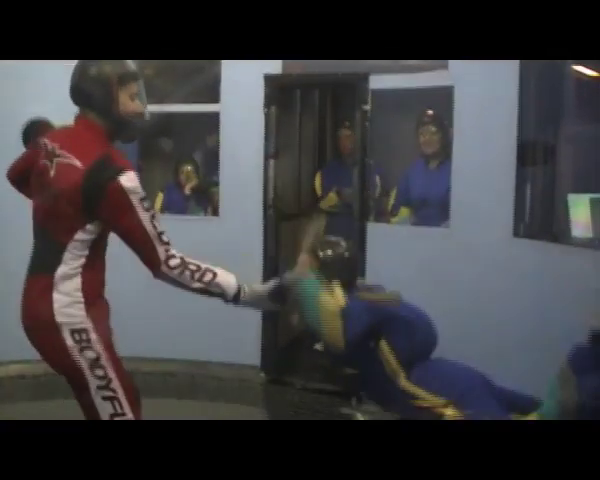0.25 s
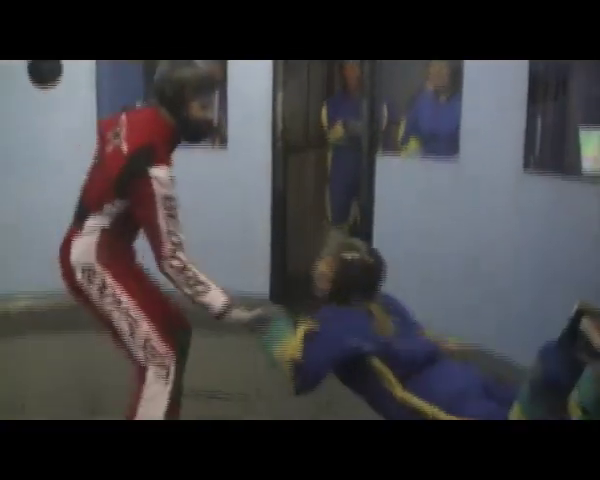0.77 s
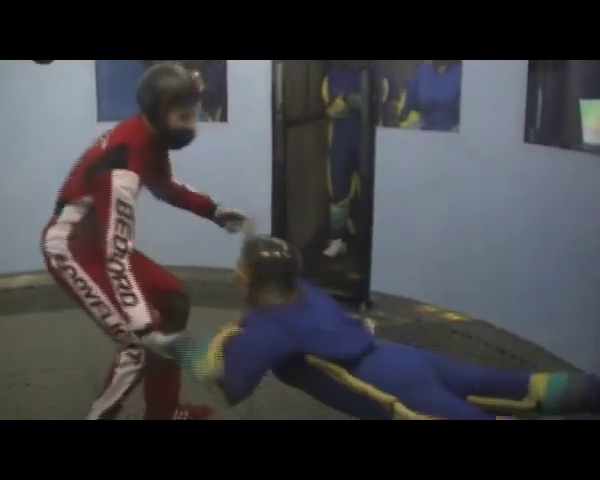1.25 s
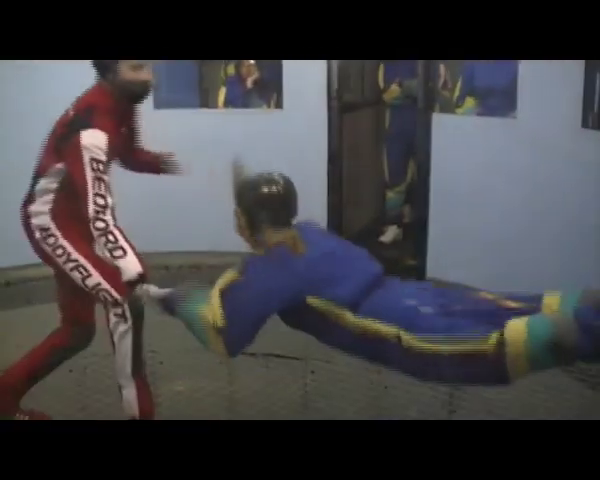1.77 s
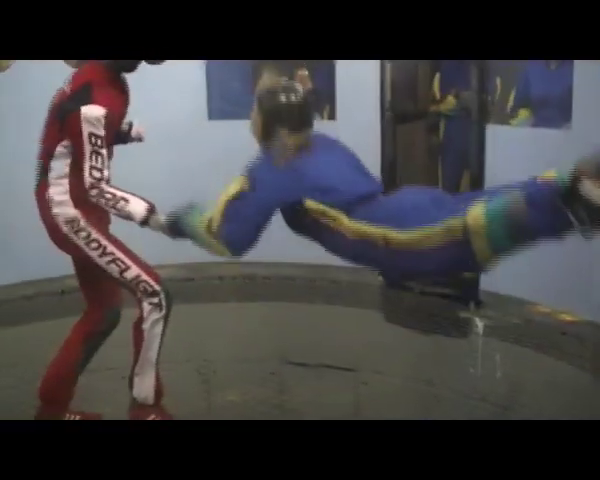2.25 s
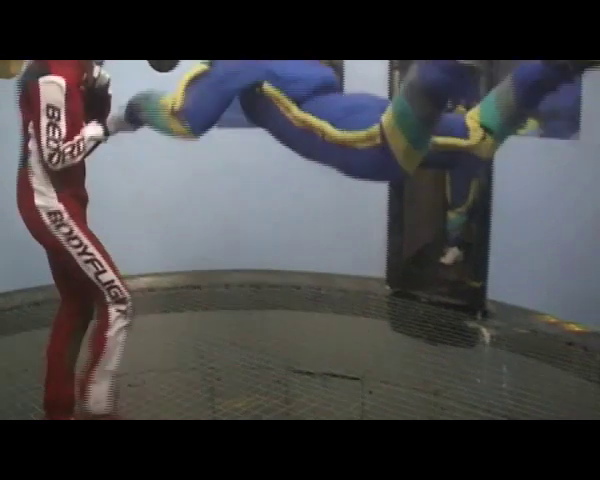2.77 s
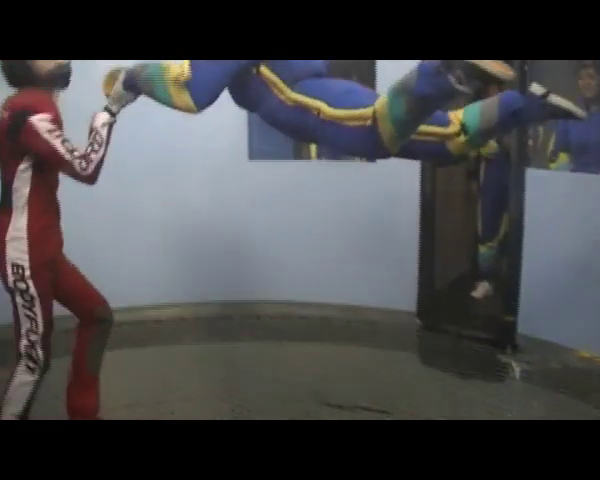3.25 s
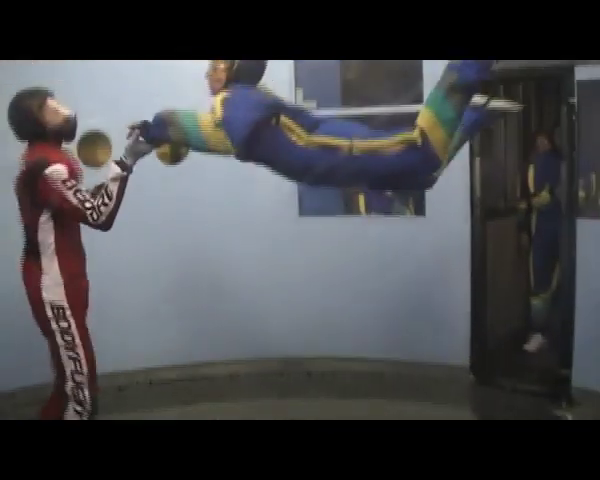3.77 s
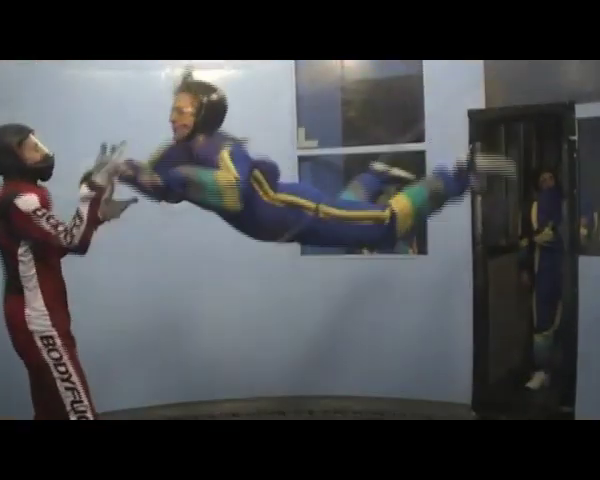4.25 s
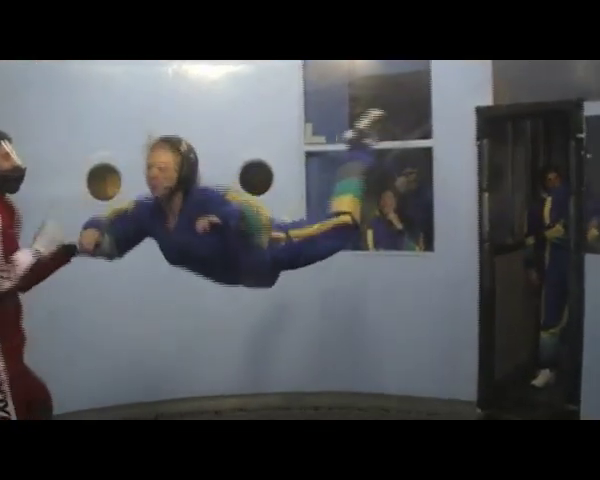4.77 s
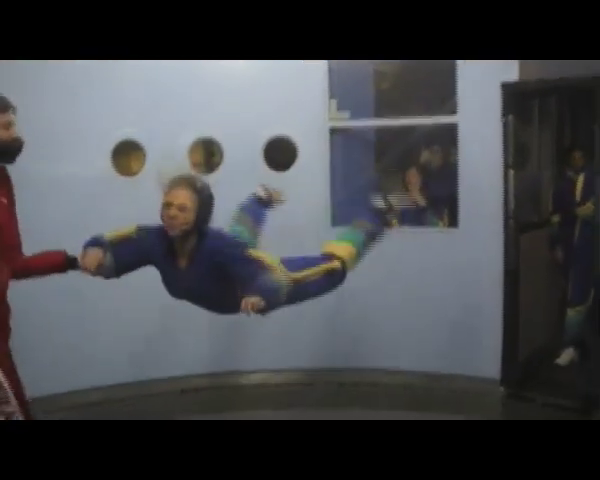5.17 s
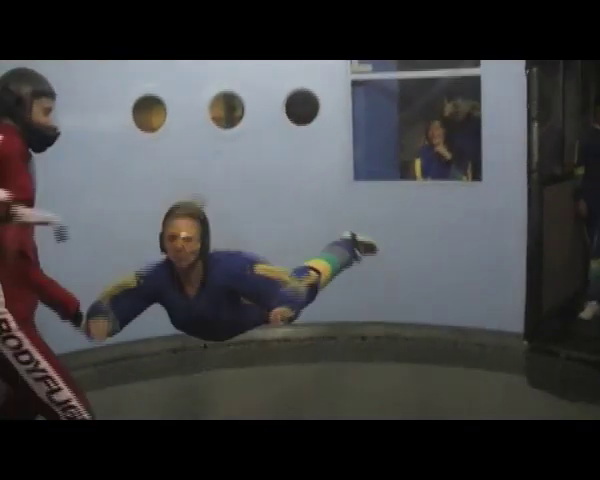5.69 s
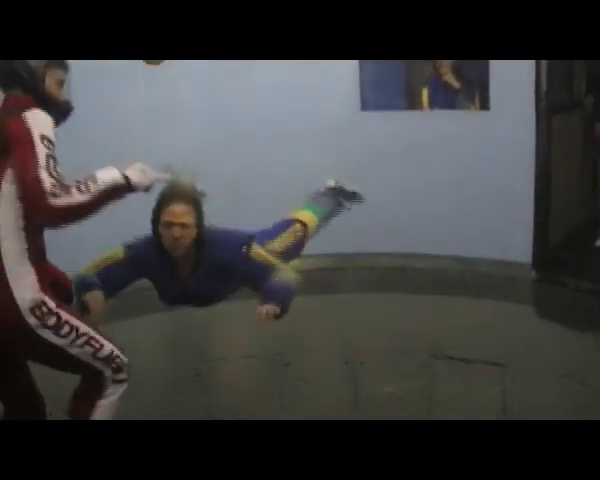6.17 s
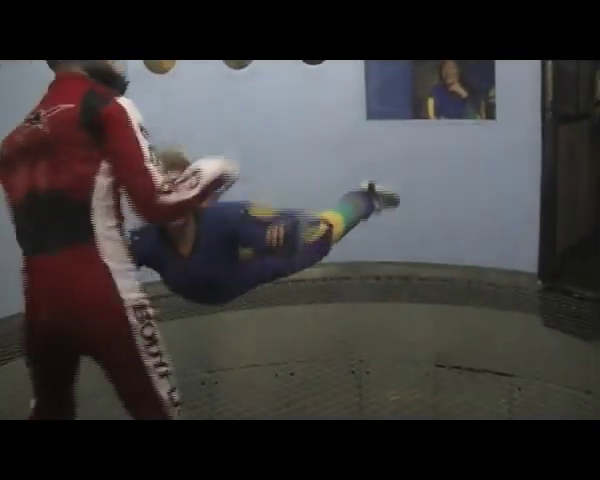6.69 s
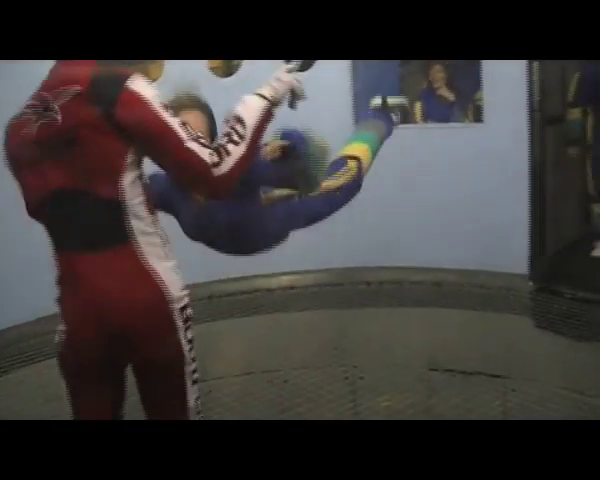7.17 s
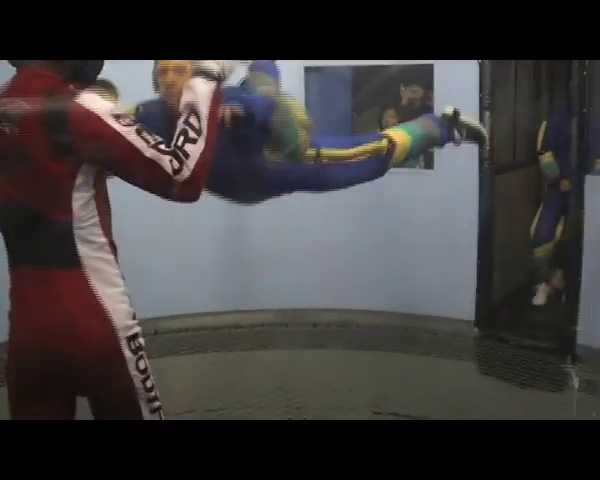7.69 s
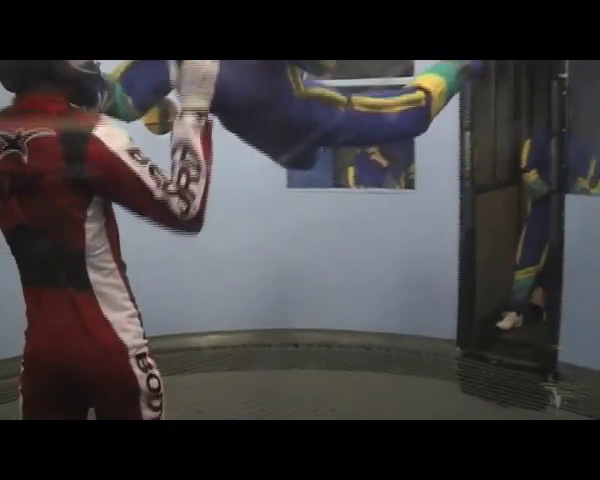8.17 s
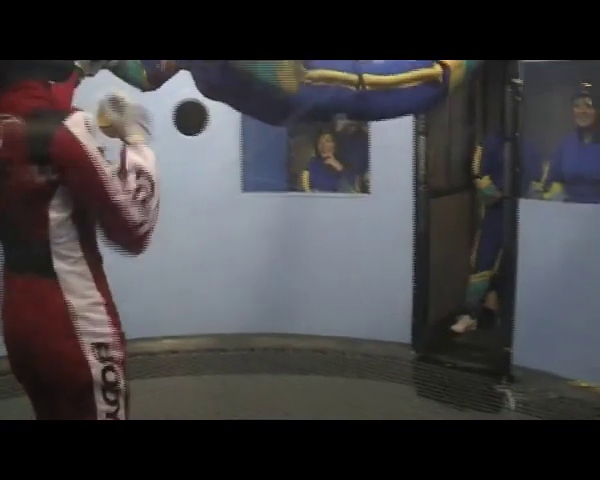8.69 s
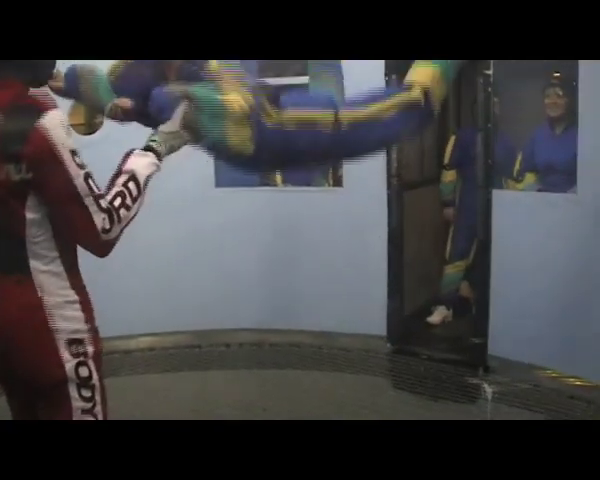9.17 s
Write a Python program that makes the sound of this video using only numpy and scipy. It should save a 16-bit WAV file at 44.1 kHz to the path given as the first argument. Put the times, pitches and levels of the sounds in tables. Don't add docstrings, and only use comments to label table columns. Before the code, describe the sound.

Large fans drone with a deep, wavering hum inside an indoor wind tunnel while a strong, steady rush of air roars throughout.

```python
import sys
import numpy as np
from scipy import signal
from scipy.fft import rfft, irfft, next_fast_len
from scipy.io import wavfile
from scipy.ndimage import uniform_filter1d

SR = 44100
rng = np.random.default_rng(int(sys.argv[2]) if len(sys.argv) > 2 else 0)


def put_to_file(sound):
    columns = np.atleast_2d(sound).T
    safe = np.clip(columns, -1, 1)
    whole_steps = np.round(safe * 32767)
    wavfile.write(sys.argv[1], SR, whole_steps.astype(np.int16))


def volts(x):
    e = np.asarray(x, float) / 20
    return 10 ** e


N = 415925

BLADE_HZ = 62.478
# (multiple of the blade rate, level [dB])
WEAK_TONES = [(1, -67.5), (7, -62), (8, -66.5), (9, -64.5), (10, -71), (11, -77.5), (12, -74), (14, -81)]
CALM_DB = [-46.5, -50, -52.5, -60.5]
FLICKER_DB, FLICKER_PER_S = [1.4, 1.2, 1.2, 1.5], 7.0
# (time [s], lift [dB], length [s])
EDDIES_3RD = [(0.84, 5, 0.75), (0.86, -10.5, 0.17), (1.42, 5.5, 0.17), (1.64, -11.7, 0.17),
              (1.88, -3.1, 0.35), (2.48, -10.5, 0.4), (3.1, -4.0, 0.14), (3.26, 3.5, 0.82),
              (3.66, -4, 0.13), (4.34, -7.5, 0.1), (4.74, -7, 0.68), (5.1, -10.5, 0.16), (5.4, 3.5, 0.16),
              (5.82, -14, 0.12), (6.18, -3.5, 0.28), (6.44, 5.3, 0.14), (6.92, -13.5, 0.18),
              (7.46, -2.5, 0.37), (7.64, -9.5, 0.1), (7.74, 5.5, 0.076), (7.98, 4, 0.4), (8.38, -5, 0.2),
              (8.58, 5, 0.1), (9.04, 6, 0.1)]
# (time [s], lift [dB], length [s])
EDDIES_4TH = [(0.72, 4, 0.1), (0.96, -0.5, 0.13), (1.2, 7.5, 0.1), (1.48, -6, 0.11), (2.16, 4, 0.81),
              (3.44, -17, 0.11), (3.82, 3, 0.088), (4.08, -2.5, 0.1), (5.08, 4, 0.92), (5.6, -10.5, 0.076),
              (6.22, 4, 0.24), (6.66, -7.5, 0.1), (6.94, -5, 0.11), (7.14, -3.1, 0.55), (7.38, -6, 0.14),
              (7.5, 5.5, 0.1), (8.1, 4, 0.14), (8.54, -16.5, 0.12), (9.06, 5.5, 0.11), (9.34, -4.5, 0.4)]
# (time [s], lift [dB], length [s])
EDDIES_5TH = [(0.06, 3.5, 0.086), (0.58, -8.5, 0.08), (0.72, 6.5, 0.078), (0.94, -6, 0.08), (1.08, 6, 0.14),
              (1.46, -3.5, 0.28), (2.46, -7.8, 0.23), (2.96, -9.5, 0.28), (3.4, 2.5, 0.55),
              (3.94, -4, 0.29), (4.18, 5.5, 0.32), (4.4, 5.0, 0.64), (4.76, 5.5, 0.088), (5.24, 5.5, 0.22),
              (5.64, 5.5, 0.14), (6.12, 5.5, 0.28), (6.56, -5, 0.34), (7.02, 4, 0.13), (7.7, 3, 0.99),
              (8.24, -17, 0.17), (8.68, 4, 0.55), (9.14, -10.5, 0.18)]
# (time [s], lift [dB], length [s])
EDDIES_6TH = [(0.68, 5, 0.9), (1.64, 4.6, 0.19), (2.34, 4, 0.13), (3.88, -9, 0.11), (4.96, -4, 0.14),
              (5.56, -7, 0.2), (6.86, -12, 0.12), (7.1, 5, 0.28), (7.78, -11.5, 0.55), (8.3, -3.5, 0.2),
              (8.62, 4, 0.14), (8.92, 4.5, 0.1)]

# (frequency [Hz], width [Hz], level [dB])
DUCT_MODES = [
    [(103.8, 4.9, -3.5), (114, 7.6, -.5)],
    [(154, 11, 0)],
]
LOW_BOOM_DB, LOW_FLICKER_DB = -51, 1.15
UPPER_BOOM_DB, UPPER_FLICKER_DB = -55, 2.5
# (time [s], lift [dB], length [s])
LOW_GUSTS = [(0.4, 1.5, 0.093), (0.9, 4.5, 0.75), (0.94, -6.5, 0.13), (1.18, -5.5, 0.13), (1.26, 6.5, 0.1),
             (1.36, -6, 0.089), (2.06, 6.5, 0.22), (2.24, -3.5, 0.14), (2.66, 4.5, 0.12), (4.02, -2, 0.38),
             (4.36, 2, 0.4), (4.68, -5.5, 0.1), (5.3, 2.5, 0.43), (5.76, -4.5, 0.1), (6.24, 3.5, 0.19),
             (6.52, -3, 0.1), (6.7, -5, 0.1), (7.04, 3.5, 0.4), (7.52, 4.5, 0.085), (7.68, -2, 0.11),
             (7.92, 5.5, 0.1), (8.12, -5, 0.25), (8.66, 4.5, 0.078), (8.96, -6, 0.11), (9.12, 4.5, 0.15),
             (9.32, -9, 0.2)]
# (time [s], lift [dB], length [s])
UPPER_GUSTS = [(0.7, 8.5, 0.1), (1.14, 3.0, 0.25), (1.44, -8, 0.1), (1.76, 5, 0.1), (2.44, 6.5, 0.75),
               (2.58, -7.5, 0.077), (2.8, 6.5, 0.085), (2.9, -8, 0.1), (3.36, 2.5, 0.4), (4.02, 3, 0.81),
               (5.24, -9.5, 0.11), (6.08, -7, 0.14), (6.6, -5.5, 0.1), (7.04, 7.5, 0.1), (7.44, 7, 0.2),
               (7.64, -9.5, 0.11), (8.34, 2.5, 0.1), (9.1, -6, 0.75)]
# (frequency [Hz], width [Hz], level [dB])
CHAMBER_MODES = [(24, 6.0, -70.5), (37, 8.8, -69.5), (63, 8.7, -64), (240.8, 6.2, -56.5), (297, 33, -62.5),
                 (652.6, 10, -73)]
# (frequency [Hz], level per Hz [dB])
RUMBLE_COLOUR = [(15, -15.5), (30, -12), (48, -15.5), (80, -12), (95, -9), (168, -4), (195, -0.5),
                 (270, -4.5), (340, -11), (400, -7.5), (545, -15.5), (600, -15), (800, -25.5)]
RUMBLE_DB = -48.5

# (frequency [Hz], level per Hz [dB])
RUSH_COLOUR = [(300, -30), (500, -4.5), (640, -5.5), (900, -11.5), (1250, -11.5), (1800, -18), (2600, -28),
               (3100, -26.5), (3480, -18.5), (3900, -26.5), (4300, -29.5), (4900, -46), (6000, -66.5)]
# (frequency [Hz], level per Hz [dB])
FIZZ_COLOUR = [(3500, -29), (4600, -1.5), (5500, -2.5), (6800, -3.5), (8000, -5.5), (9200, -11.5),
               (10200, -19), (11500, -24.5), (13000, -37.5), (16000, -47.5)]
RUSH_DB, FIZZ_DB, SURGE_DB = -59, -26.5, 0.6
# (time [s], level [dB])
AIRFLOW = [(0, .2), (.75, -0.7), (1.3, 0.5), (1.95, 1.5), (2.3, 0.1), (2.6, 1.1), (3.45, -0.2), (3.75, 0),
           (4.5, -0.2), (5.2, .8), (5.65, -2), (6.1, 1), (6.75, -0.6), (7.2, .5), (8.2, -1.2), (8.6, -.5),
           (9.43, -2.6)]
# (time [s], lift [dB])
RUSTLE = [(0, 0.5), (1.27, .6), (1.35, 0), (1.7, 1.5), (2.4, 0), (2.8, -.5), (4.3, 0.5), (4.8, 0),
          (5.4, .5), (6.6, 0), (7.0, 0), (9.43, 0)]

# (time [s], level [dB], frequency [Hz], width [Hz], length [s])
FLAPS = [(1.13, -80, 6300, 900, .035), (1.447, -89, 6000, 1500, 0.022), (1.54, -81, 6100, 1500, .025),
         (1.61, -81, 6300, 1200, .03), (1.699, -83, 6000, 2000, .035), (1.768, -83, 5700, 900, .02),
         (2.342, -93, 6460, 2500, 0.025), (4.604, -80, 6900, 500, .015), (4.617, -82, 5300, 380, .09),
         (4.64, -87, 6400, 2500, .12), (4.98, -87, 6700, 600, .07), (5.05, -83, 5000, 500, .03),
         (4.683, -87, 6000, 1500, 0.044), (5.056, -79, 7800, 1700, 0.049), (5.378, -84, 5800, 2000, 0.02),
         (6.198, -83, 7430, 2500, .03), (6.29, -86, 7500, 2520, 0.032), (7.37, -92, 7500, 2500, 0.044),
         (9.308, -80, 8300, 1000, .04)]
# (time [s], level [dB])
SNAPS = [(0.063, -84), (0.223, -90), (0.333, -86), (0.448, -85), (0.608, -88), (0.698, -90), (0.893, -89.7),
         (1.008, -89), (1.088, -84), (1.2, -87), (1.692, -87), (1.903, -88), (2.128, -89), (2.368, -87),
         (2.657, -92), (3.408, -89.9), (3.503, -89.5), (4.187, -89), (4.497, -91), (4.544, -88),
         (4.624, -89.9), (4.8, -90), (5.053, -88), (5.169, -90), (5.343, -87.5), (6.175, -93), (6.207, -87),
         (6.291, -93), (6.463, -90.5), (7.346, -90.0)]
SNAP_SOUND = 9300, 2100, .02
FAINT_COUNT, FAINT_DB, FAINT_SPREAD_DB = 120, -95.5, 4.5

# (frequency [Hz], left-right likeness, left lead [rad], left-right level [dB])
MIC_PORTS = [(30, .98, -1.35, 9), (60, .98, -.8, 5.3), (120, .998, -.6, 3.7), (250, .994, -.42, 3.0),
             (500, .955, -.3, 1.3), (1000, .905, -.1, .3), (2200, .86, .08, 1), (4400, .88, .03, .9),
             (6000, .85, 0, 1.5), (7300, .66, 0, 1.1), (8600, -.45, 0, .3), (9600, -.15, 0, .2),
             (14000, .02, 0, 1.0)]
JUMP_S, JUMP_DB = 1.2822, -55
BEFORE_DB, DIP_DB, RECOVER_S = 2.5, -2.5, 0.17
WHINE_HZ, WHINE_DB = 15625.03, -117.5
HISS_DB = -103


def fans(gain_db, boom_db):
    strong = 0
    for k, eddies in enumerate([EDDIES_3RD, EDDIES_4TH, EDDIES_5TH, EDDIES_6TH]):
        flicker_db = FLICKER_DB[k] * wander(FLICKER_PER_S)[0]
        level_db = CALM_DB[k] + swells(eddies) + gain_db + flicker_db
        strong = strong + tone(k + 3, level_db, sway=0.3)
    weak = 0
    for multiple, db in WEAK_TONES:
        weak = weak + tone(multiple, db + gain_db + 1.8 * wander(6.8)[0], sway=.35)
    second = tone(2, boom_db - 2.5, sway=0.3)
    return strong + weak + second


def tone(multiple, level_db, sway):
    turns = multiple * BLADE_HZ * np.arange(N) / SR
    turns += .13 * multiple ** 2 + .02 * rng.random()
    scramble = [[sway], [2.5]]
    return np.sqrt(2) * volts(level_db) * np.cos(2 * np.pi * turns + scramble * wander(4.7))


def duct(gain_db, boom_db):
    low_noise, upper_noise = [ringing(modes) for modes in DUCT_MODES]
    low = volts(boom_db) * levelled(low_noise, 0.055)
    upper_flicker_db = UPPER_FLICKER_DB * wander(11.0)[0]
    upper_db = UPPER_BOOM_DB + gain_db + swells(UPPER_GUSTS) + upper_flicker_db
    upper = volts(upper_db) * levelled(upper_noise, 0.15)
    chamber = sum(volts(db) * ringing([(f, width, 0)]) for f, width, db in CHAMBER_MODES)
    rumble_colour = RUMBLE_COLOUR + [(1200, -77.5)]
    rumble = volts(RUMBLE_DB) * coloured(lambda hz: volts(read(rumble_colour, hz)))
    return low + upper + volts(gain_db) * (chamber + rumble)


def stream(rush_db, fizz_db):
    rush = coloured(lambda hz: volts(read(RUSH_COLOUR, hz)))
    fizz = coloured(lambda hz: volts(read(FIZZ_COLOUR, hz)))
    gust = wander(13.0)
    rush_level = volts(rush_db + 0.27 + 0.12 * gust[0])
    fizz_level = volts(rush_db + fizz_db + 3.0 + .7 * gust[1])
    return rush_level * rush + fizz_level * fizz


def flaps():
    size, middle = 8192, 4096
    faint = []
    for u, v in rng.random((FAINT_COUNT, 2)):
        faint.append((u ** 1.6 * (N - middle) / SR, FAINT_DB - FAINT_SPREAD_DB * v))
    snaps = [(s, db + .8, *SNAP_SOUND) for s, db in SNAPS + faint]

    out = np.zeros((2, N))
    t = (np.arange(size) - middle) / SR
    hz = np.fft.rfftfreq(size, 1 / SR)
    for s, db, centre_hz, width, length in FLAPS + snaps:
        noise = rfft(rng.standard_normal((2, size)))
        puff = evened(irfft(noise * mode(hz, centre_hz, width)))
        part = volts(db) * puff * np.exp(-(t / length * 2) ** 2)
        at = round(s * SR) - middle
        out[:, max(at, 0):at + size] += part[:, max(-at, 0):N - at]
    return out


def camera_gain():
    after = np.arange(N) / SR - JUMP_S
    dip_db = DIP_DB * np.exp(-abs(after) / RECOVER_S)
    return uniform_filter1d(np.where(after < 0, BEFORE_DB, dip_db), size=200)


def ports(direct, scattered):
    size = next_fast_len(N)
    hz = np.fft.rfftfreq(size, 1 / SR)
    likeness = np.clip(read(MIC_PORTS, hz), -1, 1)
    balance = volts(read(MIC_PORTS, hz, col=3) / 2)
    tilt = balance * np.exp(.5j * read(MIC_PORTS, hz, col=2))
    shared = rfft(direct, size) * np.sqrt((1 + likeness) / 2)
    opposed = rfft(scattered, size) * np.sqrt((1 - likeness) / 2)
    left, right = (shared + opposed) * tilt, (shared - opposed) / tilt
    return irfft(np.array([left, right]), size)[:, :N]


def camera_noise():
    n = np.arange(N)
    bump = np.exp(-((n - JUMP_S * SR) / 1.1) ** 2)
    click = volts(JUMP_DB) * np.diff(bump, prepend=0) * [[.7], [1.3]]
    whine = volts(WHINE_DB) * np.sqrt(2) * np.sin(2 * np.pi * WHINE_HZ * n / SR) * [[2.0], [-.1]]
    hiss = volts(HISS_DB) * rng.standard_normal((2, N))
    return click + whine + hiss


def swells(rows):
    t = np.arange(0, N + 64, 64) / SR
    lift_db = sum(db * np.exp(-((t - s) / length * 2) ** 2) for s, db, length in rows)
    return np.interp(np.arange(N) / SR, t, lift_db)


def wander(per_s):
    return coloured(lambda hz: mode(hz, 0, per_s * 2))


def ringing(modes):
    return coloured(lambda hz: sum(volts(db) * mode(hz, f, width) for f, width, db in modes))


def mode(hz, centre_hz, width):
    return 1 / (1 + ((hz - centre_hz) / width * 2) ** 2)


def coloured(gain):
    size = next_fast_len(N)
    hz = np.fft.rfftfreq(size, 1 / SR)
    noise = rfft(rng.standard_normal((2, size)))
    return evened(irfft(noise * gain(hz), size)[:, :N])


def evened(x):
    return x / np.sqrt(np.mean(abs(x) ** 2, -1, keepdims=True) + 1e-30)


def levelled(x, seconds):
    width = int(seconds * SR)
    power = uniform_filter1d(x ** 2, width, axis=-1)
    return x / np.sqrt(uniform_filter1d(power, width, axis=-1) + 1e-9)


def read(points, hz, col=1):
    points = np.array(points)
    return np.interp(np.log(hz + 1), np.log(points[:, 0] + 1), points[:, col])


def curve(rows):
    times, levels = np.transpose(rows)
    return np.interp(np.arange(N) / SR, times, levels)


def scene():
    gain_db = camera_gain()
    boom_db = LOW_BOOM_DB + gain_db + swells(LOW_GUSTS) + LOW_FLICKER_DB * wander(6.0)[0]
    air_db = gain_db + curve(AIRFLOW) + SURGE_DB * wander(2.3)[0]
    air = stream(RUSH_DB + air_db, FIZZ_DB + curve(RUSTLE))
    direct, scattered = fans(gain_db, boom_db) + duct(gain_db, boom_db) + air + flaps()
    return ports(direct, scattered)


def roll_off(x):
    return signal.sosfilt(signal.butter(12, 15720, fs=SR, output="sos"), x)


def record(dry):
    mix = dry + camera_noise()
    return roll_off(mix)


dry = scene()
out = record(dry)
put_to_file(out)
```